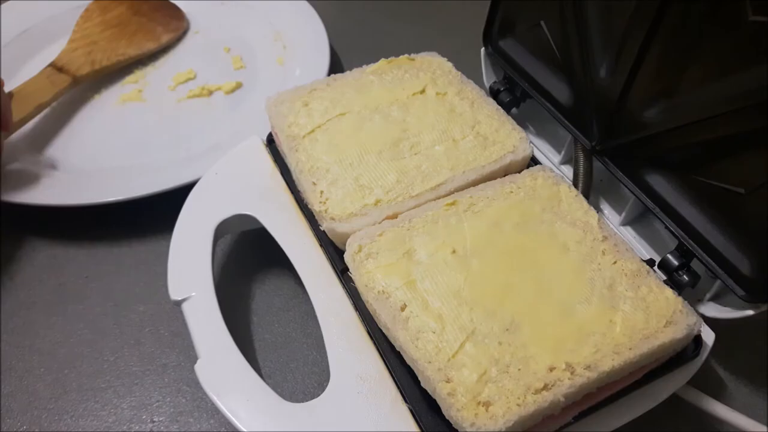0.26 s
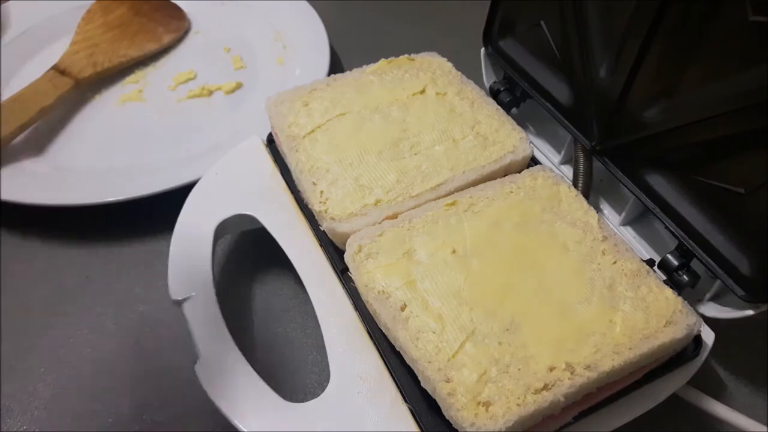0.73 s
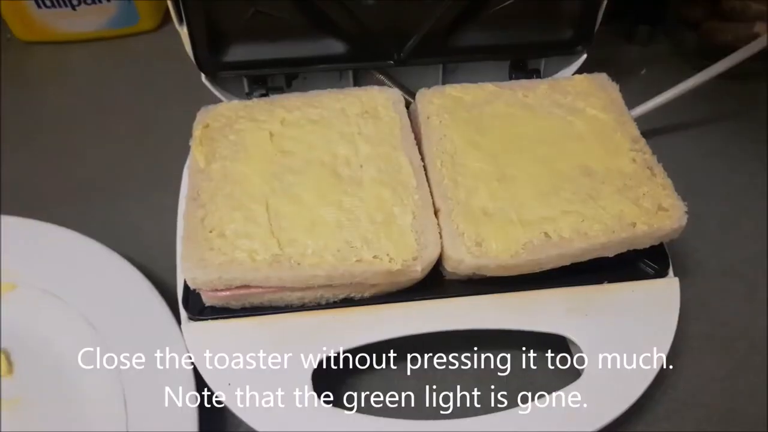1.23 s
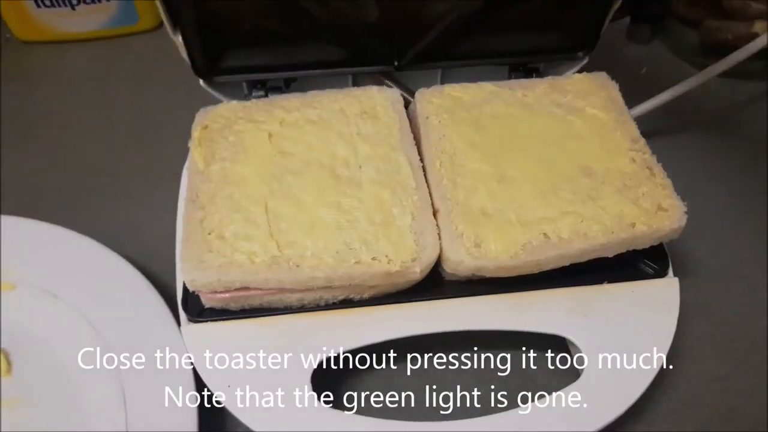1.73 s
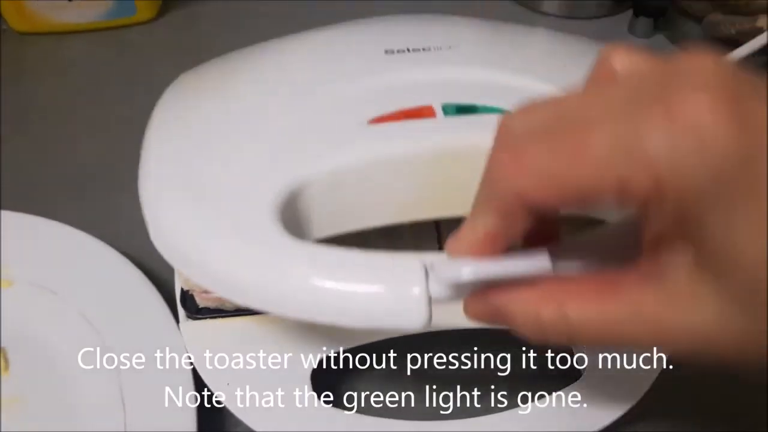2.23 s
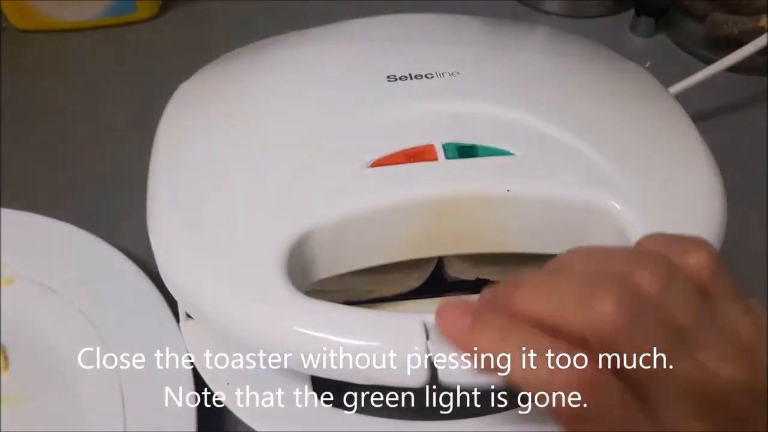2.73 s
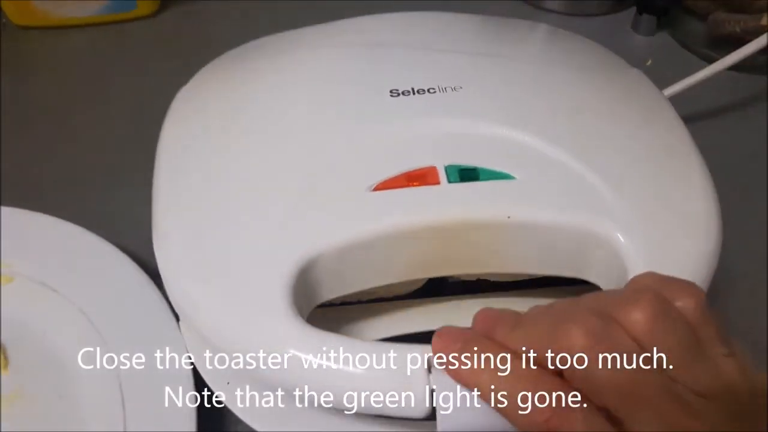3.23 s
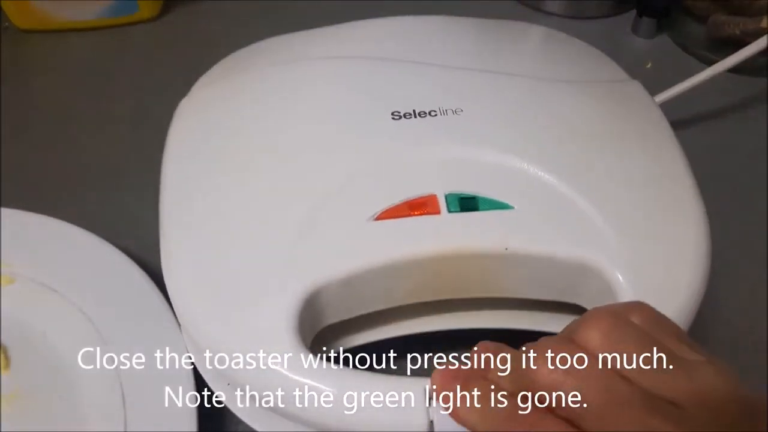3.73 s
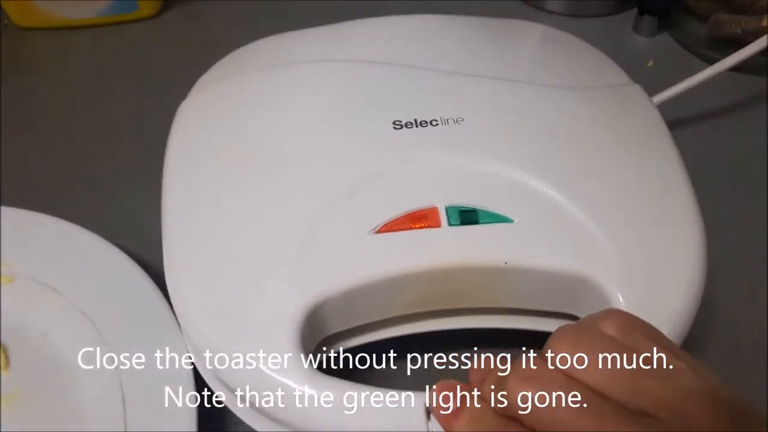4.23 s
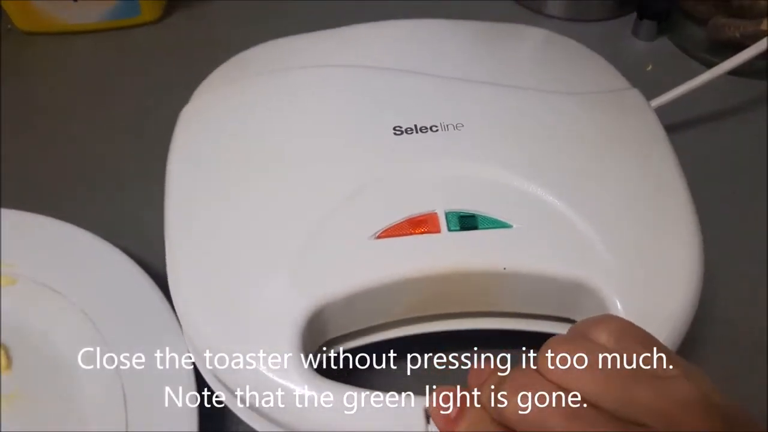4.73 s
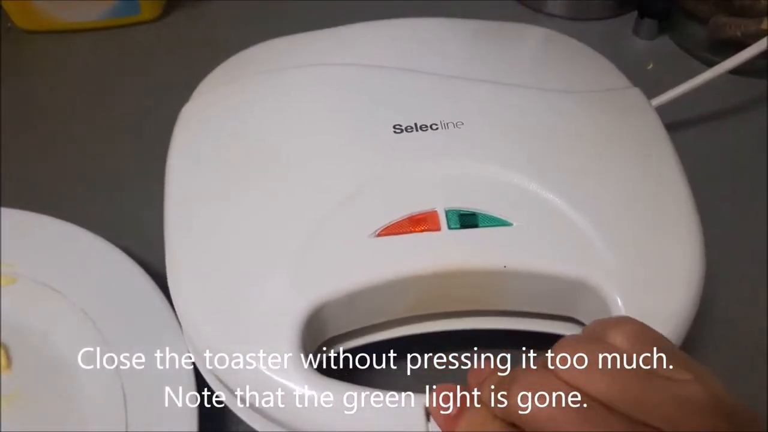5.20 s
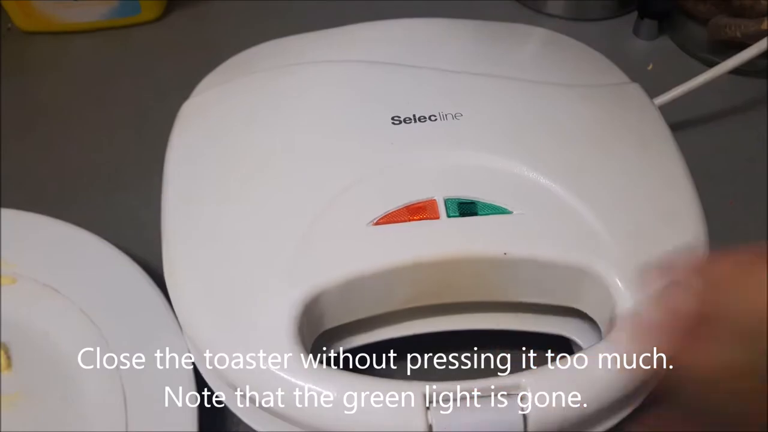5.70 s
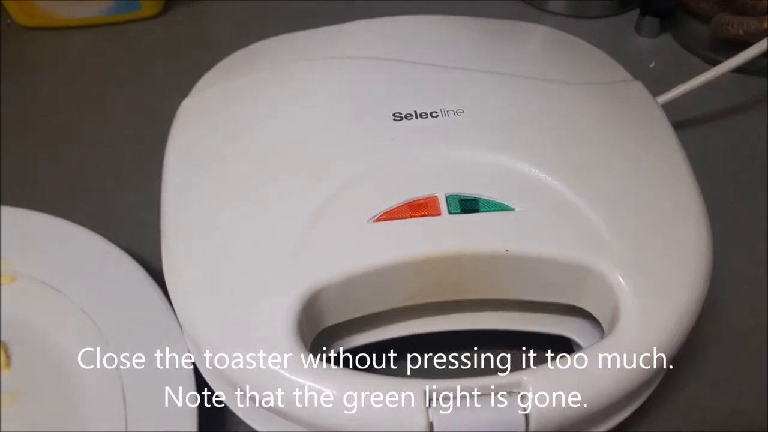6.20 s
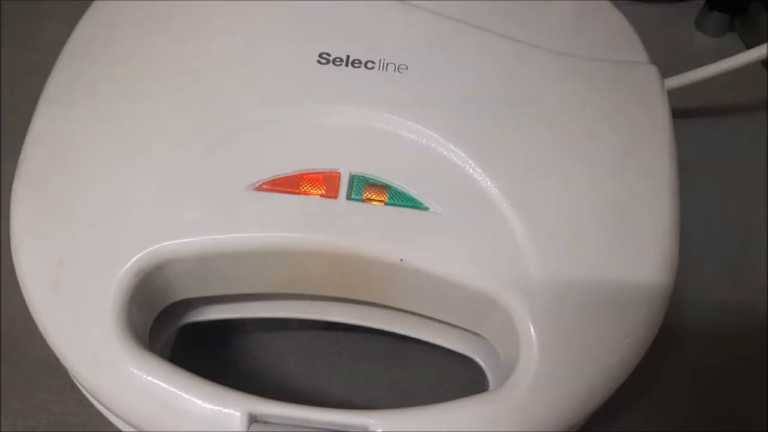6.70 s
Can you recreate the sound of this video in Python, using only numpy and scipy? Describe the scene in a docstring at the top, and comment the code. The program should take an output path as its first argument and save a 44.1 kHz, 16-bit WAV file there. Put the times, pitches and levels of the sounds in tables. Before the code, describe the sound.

A few ringing knocks of a utensil on a china plate open the scene, and the sound briefly cuts out. Close by, butter spits in a hot sandwich toaster while its plastic lid creaks over and drops with a sharp clack. Lighter knocks follow, and a high sizzle surges, then dulls to soft gurgling and crackling under the shut lid. A faint, low hum runs beneath it all in a small kitchen.

```python
"""A utensil knocks and clatters on a china plate, ringing its modes and thudding into a kitchen worktop.
After a short fade to silence, the plastic lid of a sandwich toaster close by is pulled over, clacks down
and is pressed onto buttered bread. Water bursting in the hot butter spits, flares into a sizzle and
sinks to a muffled bubbling as the lid seals. A low appliance hum lies underneath."""
import sys
import numpy as np
from scipy import signal
from scipy.fft import rfft, irfft, next_fast_len
from scipy.io import wavfile
from scipy.ndimage import uniform_filter1d

SR = 44100
rng = np.random.default_rng(int(sys.argv[2]) if len(sys.argv) > 2 else 0)


def wrap_up_sound(samples):
    """Save the sound to the file named by the first command line argument, as 16-bit audio."""
    columns = np.atleast_2d(samples).T
    # keep every value between -1 and 1, then stretch to whole-number steps
    tamed = np.clip(columns, -1, 1)
    steps = np.round(tamed * 32767).astype(np.int16)
    wavfile.write(sys.argv[1], SR, steps)


N = 306495
TIME = np.arange(N) / SR
RING_TIME = TIME[:SR // 2]


def amp(db):
    """Amplitude ratio of a level in decibels."""
    return 10 ** (np.asarray(db) / 20)


def unit(x):
    """Normalisation to rms 1."""
    return x / np.sqrt(np.mean(x ** 2) + 1e-20)


def read(points, hz):
    """Interpolation on a log-frequency axis."""
    point_hz, value = np.transpose(points)
    return np.interp(np.log(hz + 1), np.log(point_hz + 1), value)


def add(mix, start_s, sound):
    """Superposition of a sound onto the mix."""
    part = mix[max(round(start_s * SR), 0):][:len(sound)]
    part += sound[:len(part)]


def through(x, response):
    """Convolution, cut to the input's length."""
    return signal.oaconvolve(x, response)[:len(x)]


def pulse(spectrum, size=4096):
    """Minimum phase: the shortest causal pulse with a given spectrum, peak 1."""
    log_gain = np.log(amp(read(spectrum, abs(np.fft.fftfreq(size, 1 / SR)))))
    response = np.fft.ifft(np.exp(np.conj(signal.hilbert(log_gain)))).real[:size // 2]
    return response / abs(response).max()


def noise(gain_at, size=N):
    """Gaussian noise of rms 1, shaped by a function of frequency."""
    hz = np.fft.rfftfreq(next_fast_len(size, True), 1 / SR)
    real, imag = rng.standard_normal((2, len(hz)))
    return unit(irfft((real + 1j * imag) * gain_at(hz))[:size])


def dying(t60_s):
    """Exponential decay by 60 dB in t60_s."""
    return np.exp(-np.log(1000) * RING_TIME / t60_s)


def ramp(start_s, length_s):
    """Linear rise from 0 to 1."""
    return np.clip((TIME - start_s) / length_s, 0, 1)


def swell(peak_s, hold_s, rise_db_per_s, fade_db_per_s):
    """Exponential growth to 1, a hold, then exponential decay."""
    before_s, after_s = np.maximum(peak_s - TIME, 0), np.maximum(TIME - peak_s - hold_s, 0)
    return amp(-rise_db_per_s * before_s - fade_db_per_s * after_s)


def bell(hz, centre_hz, octaves):
    """Band-pass gain, symmetric in log frequency."""
    return 1 / (1 + (np.log2((hz + 1) / centre_hz) / octaves) ** 4)


def ring(modes):
    """Free vibration: a sum of damped sinusoids."""
    return sum(amp(db) * dying(t60_s) * np.sin(2 * np.pi * hz * RING_TIME) for hz, db, t60_s in modes)


def scatter(cloud_db, t60_s):
    """An impulse followed by a decaying cloud of smaller ones."""
    cloud = rng.standard_normal(len(RING_TIME)) * dying(t60_s) * (1 - dying(t60_s / 10))
    return signal.unit_impulse(len(cloud)) + amp(cloud_db) * cloud / np.linalg.norm(cloud)


def bursts(per_s, spread_db):
    """Shot noise of rms 1: random clicks, most small and a few large."""
    size = amp(spread_db * np.minimum(rng.exponential(1, N), 4)) * rng.choice([-1, 1], N)
    occurs = rng.random(N) < per_s / SR
    return unit(size * occurs / np.sqrt(per_s))


def kitchen(x, wet_db, bass_t60_s, treble_t60_s):
    """Reverberation: a diffuse tail with its own decay time at each frequency."""
    reflections = rng.standard_normal(len(RING_TIME)) * (1 - dying(0.025))
    hz, t, bands = signal.stft(reflections, SR, nperseg=256)
    t60_s = read([(200, bass_t60_s), (10000, treble_t60_s)], hz)[:, None]
    tail = signal.istft(bands * np.exp(-np.log(1000) * t / t60_s), SR, nperseg=256)[1]
    return x + amp(wet_db) * through(x, tail / np.linalg.norm(tail))


# partials of the appliance hum: pitch_hz, level_db, width_hz
HUM_PARTIALS = [(49.7, -68.5, 3), (101.8, -66, 8.5), (146.75, -57, 28), (291, -66.5, 11), (393, -76, 10),
                (596, -78.5, 4.1)]
# the kitchen's air noise: frequency_hz, level_db
AIR_SPECTRUM = [(15, 8), (40, 8.5), (70, -1), (140, 3), (220, -1), (330, -5.5), (550, -6), (1000, -11),
                (2000, -20.5), (4000, -24), (6500, -33.5), (16000, -32)]

def background():
    """Random amplitude and phase modulation makes a hum waver over steady air noise."""
    hum, frames = np.zeros(N), TIME[::100]
    for hz, db, width_hz in HUM_PARTIALS:
        pole = np.exp(-np.pi * width_hz * frames[1])
        waver = unit(signal.lfilter([1], [1, -pole], rng.standard_normal((2, len(frames)))))
        wobble, drift = (np.interp(TIME, frames, row) for row in waver)
        hum += amp(db + 2.4 * wobble) * np.sqrt(2) * np.sin(2 * np.pi * hz * TIME + 0.47 * drift)
    return hum + amp(-57) * noise(lambda f: amp(read(AIR_SPECTRUM, f)))


# strokes of hinge and bread as the lid moves: start_s, length_s, level_db, centre_hz
RUB_STROKES = [(1.675, 0.13, -54.5, 615), (1.788, 0.055, -52.5, 1840), (1.832, .06, -55.5, 600),
               (2.18, 0.093, -51.5, 920), (2.24, .12, -53, 630), (4.224, 0.098, -57, 2400)]

def rubbing():
    """Stick-slip friction: uneven slips, each a dull click, swell and fade through a stroke."""
    out, slips = np.zeros(N), bursts(per_s=490, spread_db=1)
    for start_s, length_s, db, centre_hz in RUB_STROKES:
        stroke = slips[round(start_s * SR):round((start_s + length_s) * SR)]
        band = bell(np.fft.rfftfreq(len(stroke), 1 / SR), centre_hz, octaves=0.6)
        rub = irfft(rfft(stroke) * band)
        add(out, start_s, amp(db) * unit(rub * signal.windows.tukey(len(rub))))
    return out


# blows on the plate: start_s, thud_db, ring_db, centre_hz, spread_octaves, splash_db, splash_t60_s
UTENSIL_BLOWS = [(0.0, -24, -33, 800, 1.37, -46, 0.15), (0.013, -44, -32.5, 2223, 0.02, -82, 0.14),
                 (0.031, -33.5, -27.5, 2400, 0.02, -77, .16), (0.338, -27.5, -28, 1555, 0.11, -32.5, 0.06),
                 (0.46, -35, -16.5, 7500, 0.9, -20.5, 0.21), (0.4615, -14.5, -17, 1900, 2.2, -19.5, 0.15),
                 (0.475, -22.5, -32, 2394, 0.49, -21.5, 0.13),
                 (0.497, -30.5, -29.5, 2603, 0.56, -34.5, .13)]
# china modes, in close pairs: pitch_hz, level_db
CHINA_MODES = [(686, -15), (729, -14), (801, -13), (1379, -14), (1444, -9), (1517, -15), (1692, -17),
               (1725, -16), (2174, -13), (2208, -11), (2243, 0), (2480, -17), (2719, -15), (2777, -6),
               (2838, -13), (3032, -10), (3080, -15), (3166, -18), (3951, -19), (4002, -18), (4182, -16),
               (4230, -20), (4381, -21), (4489, -21), (4996, -23), (5238, -24), (7309, -23), (8609, -22),
               (9910, -23), (10028, -21), (12840, -33), (14750, -33)]
# their damping: pitch_hz, t60_s
CHINA_DECAY = [(700, .2), (2240, .195), (2800, .18), (10000, .16)]
# modes of the worktop and what stands on it: pitch_hz, level_db, t60_s
WORKTOP_MODES = [(102, -24.5, 0.15), (148, -14, 0.68), (183.8, -10.5, 0.74), (237.2, -17, 0.3),
                 (283, -13.5, 0.15), (380.4, -4, 0.18), (425, 6.5, 0.017), (466, -12, 0.18),
                 (538.7, -9.5, 0.27)]
# a blow's thud and its splash of fine modes: frequency_hz, level_db
THUD_SPECTRUM = [(60, -33.5), (200, -4), (400, 3.5), (800, -3), (1100, -11), (2800, -15), (3600, -41),
                 (8000, -46), (16000, -64.5)]
SPLASH_SPECTRUM = [(300, -23.5), (1100, -17), (1500, -1.5), (2000, -5), (2900, -0.5), (3600, -19),
                   (4300, -11), (6000, -23), (7200, -19), (10000, -16), (12000, -23.5), (16000, -43)]

def plate():
    """Modal excitation: a blow rings the china modes its contact favours, finer ones and the worktop."""
    out, thud_pulse, splash_pulse = np.zeros(N), pulse(THUD_SPECTRUM), pulse(SPLASH_SPECTRUM)
    china = np.array([ring([(hz, db, read(CHINA_DECAY, hz))]) for hz, db in CHINA_MODES])
    china *= rng.choice([-1, 1], (len(china), 1))  # each mode starts upward or downward
    boom = amp(-5) * ring(WORKTOP_MODES) * (1 - dying(0.013))
    for start_s, thud_db, ring_db, centre_hz, octaves, splash_db, t60_s in UTENSIL_BLOWS:
        clink = bell(np.array(CHINA_MODES)[:, 0], centre_hz, octaves) @ china
        splash = through(scatter(cloud_db=11, t60_s=t60_s), splash_pulse)
        cutoff_hz = min(2.2 * centre_hz, SR / 2.5)  # a soft contact gives little treble
        splash = signal.lfilter(*signal.butter(2, cutoff_hz, fs=SR), splash)
        thud = through(scatter(cloud_db=6, t60_s=0.58 * t60_s), thud_pulse) + boom
        add(out, start_s, amp(ring_db) * clink + amp(splash_db) * splash + amp(thud_db) * thud)
    return out


# low bumps through the worktop and the toaster's feet: start_s, level_db
BUMPS = [(0.559, -41), (0.70, -41.5), (1.676, -38.5), (1.865, -43), (2.022, -30)]
# modes of the feet: pitch_hz, level_db, t60_s
FEET_MODES = [(99.5, 3, 0.28), (122, -23, 0.16)]

def rocking():
    """Mass on a spring: each bump sets the toaster vibrating on its feet."""
    out, bump = np.zeros(N), ring(FEET_MODES) * (1 - dying(0.038))
    for start_s, db in BUMPS:
        add(out, start_s, amp(db) * bump)
    return out


# the lid falls onto its hinge stop and rattles: start_s, level_db
LID_CLACKS = [(2.0165, -6), (2.0197, -45), (2.028, -21), (2.0442, -24)]
# one clack: frequency_hz, level_db
CLACK_SPECTRUM = [(50, -28.5), (200, -10.5), (255, -12), (340, 4), (600, -5), (1050, -12), (1500, -12),
                  (1900, -19), (3000, -31.5), (5500, -33), (11000, -35), (12500, -46.5), (16000, -52.5)]
# modes of the toaster's casing: pitch_hz, level_db, t60_s
CASING_MODES = [(191, 1, 0.19), (346, 6, 0.058), (384, 4, .12), (430, 11.5, 0.063), (521, -2.5, 0.13),
                (610, -23, .2), (713, -1.5, 0.19), (835, 2, .13), (938, -2.5, 0.16), (1270, -12.5, 0.14),
                (1540, -9.5, .1)]
# knocks of lid, hinge and handle: start_s, level_db, pitch_hz, relative_thump_db
LID_KNOCKS = [(1.544, -37, 2900, -9), (1.590, -36, 545, -7), (1.657, -36, 2880, -12),
              (1.668, -24.5, 703, -6), (1.728, -36.5, 600, 5), (1.826, -30.5, 1960, -1.5),
              (1.9471, -36.5, 2900, 0), (2.0033, -22, 1450, -7), (2.201, -33.5, 705, 1),
              (2.223, -30, 568, -1), (2.2398, -21.5, 808, 1.5), (2.3065, -40, 570, 2),
              (2.4287, -40.5, 506, 1), (2.5254, -33, 568, -2), (2.5461, -23, 440, -7.5),
              (2.860, -33, 4290, -11), (2.8614, -31.5, 1800, -3), (3.146, -41.5, 1000, 6),
              (4.2144, -45.5, 2000, 1), (4.255, -42.5, 880, 7), (4.6448, -40.5, 1810, -14),
              (5.594, -46, 1090, 6), (5.6916, -37, 1820, -1), (5.695, -37.5, 530, -18),
              (5.955, -48, 990, 0), (6.4785, -45.5, 1250, 4.5), (6.5366, -49.5, 1070, 7),
              (6.6867, -45.5, 1500, 11)]

def lid():
    """Impact excitation: the clack rings the casing; lighter knocks ring one spot of the plastic."""
    out, clack, casing = np.zeros(N), pulse(CLACK_SPECTRUM), ring(CASING_MODES)
    for start_s, db in LID_CLACKS:
        blow = through(scatter(cloud_db=-1, t60_s=0.042), clack)
        add(out, start_s, amp(db) * (blow + amp(-26.5) * casing))
    for start_s, db, hz, thump_db in LID_KNOCKS:
        t60_s = 0.03 * (1000 / hz) ** 0.65  # higher pitches die sooner
        rattle_db = -8 + 4 * np.log2(hz / 1000)  # and rattle more
        rattle = noise(lambda f: bell(f, hz, octaves=0.75), size=len(RING_TIME)) * dying(t60_s)
        knock = ring([(hz, -1, t60_s)]) + amp(rattle_db) * rattle
        add(out, start_s, amp(db) * knock * (1 - dying(0.0029)))
        add(out, start_s, amp(db + thump_db) * clack)
    return out


# butter flares up where the bread meets the hot plate:
# peak_s, hold_s, rise_db_per_s, fade_db_per_s, fizz_db, crackle_db
BUTTER_FLARES = [(0, 0.81, 20, 30, -62.5, -69), (1.68, 0.3, 21.5, 6, -55, -60.5),
                 (2.228, 0.024, 125, 150, -45.5, -50.5), (2.775, 0.088, 75, 60, -48.5, -63),
                 (2.966, .22, 240, 51, -40, -63), (3.269, 0.12, 126, 79, -36.5, -57.5),
                 (3.6, 0.25, 30.5, 12, -51, -72)]

def frying():
    """Incoherent sources add in power: the summed flares give the gains of fizz and crackle."""
    fizz_power, crackle_power = amp(-84) ** 2, 0  # a faint fizz remains under the shut lid
    for *shape, fizz_db, crackle_db in BUTTER_FLARES:
        flare = swell(*shape)
        fizz_power += (amp(fizz_db) * flare) ** 2
        crackle_power += (amp(crackle_db) * flare) ** 2
    return np.sqrt(fizz_power), np.sqrt(crackle_power)


# the loudest spits of butter: start_s, level_db, pitch_hz
LOUD_SPITS = [(.0817, -41, 13000), (.7484, -37.5, 9500), (1.3214, -39, 2720), (1.4255, -35.5, 9800),
              (1.5462, -37, 11000), (1.5886, -32.5, 3003), (1.7345, -38, 10000), (1.763, -37, 11000),
              (1.8865, -42, 10000), (2.1685, -31, 12500), (2.201, -29.5, 10000), (2.374, -37, 10500),
              (2.9052, -25, 13500), (2.943, -26.5, 13000), (3.3372, -22, 9000), (5.4568, -43.5, 8500)]
# the snap of one spit: frequency_hz, level_db
SNAP_SPECTRUM = [(500, -29.5), (1500, -23.5), (2600, 0.5), (3300, -30), (4100, -5.5), (6200, -6), (8000, 2),
                 (10000, 10), (12500, -1.5), (16000, -11)]

def spits():
    """Flash boiling: water drops burst in hot butter, a few loudly, the rest as a random spatter."""
    snap = pulse(SNAP_SPECTRUM)
    fizz_gain, _ = frying()
    spits_per_s, over_fizz_db = 14, rng.uniform(9, 19, N)
    spatter = fizz_gain * amp(over_fizz_db) * (rng.random(N) < spits_per_s / SR)
    out = through(spatter, through(scatter(cloud_db=3, t60_s=0.011), snap))
    for start_s, db, hz in LOUD_SPITS:
        bubble_ring = noise(lambda f: bell(f, hz, octaves=0.3), size=len(RING_TIME)) * dying(0.012)
        burst = through(scatter(cloud_db=3, t60_s=0.012), snap)
        add(out, start_s, amp(db) * (burst + amp(-7) * bubble_ring))
    return out


def boiling(course):
    """Power sum of a swelling boil and its resting level, as a gain."""
    *shape, top_db, rest_db = course
    return np.hypot(amp(top_db) * swell(*shape), amp(rest_db))


# water boils inside the bread: peak_s, hold_s, rise_db_per_s, fade_db_per_s, top_db, rest_db
GURGLE_COURSE = (1.62, 3, 35.5, 8, -54.5, -66)
CRACKLE_COURSE = (3.5, 0.81, 11.5, 13, -56.5, -80.5)
STEAM_COURSE = (4.5, 0.53, 25, 30, -69, -94.5)
# bubbles at the open edge (fizz) and under the lid (gurgle, crackle): frequency_hz, level_db
FIZZ_SPECTRUM = [(1500, -45), (4500, -28), (6000, -18.5), (7000, -13), (8100, -8), (9700, 0.5), (11000, -2),
                 (12500, -11), (14500, -8.5), (16000, -12)]
GURGLE_SPECTRUM = [(60, -40), (120, -16), (220, -9), (330, 2.5), (520, 0), (760, -3), (1050, -4.5),
                   (1500, -14), (2500, -19.5), (6000, -36.5), (16000, -55.5)]
CRACKLE_SPECTRUM = [(500, -20), (1400, -8), (2000, -2), (2450, -1), (3300, -9), (4200, -4.5), (6000, -17),
                    (9000, -16.5), (16000, -44.5)]

def sizzle():
    """Shot noise of bursting bubbles: bright clumps at the open edge, duller ones under the lid."""
    fizz_gain, flare_crackle_gain = frying()
    clumps = amp(2.5 * noise(lambda f: 1 / (1 + (f / 250) ** 2)))
    bursts_per_s = 1350 + 4150 * ramp(start_s=2, length_s=0.8)  # the lid squeezes the bread
    bright = unit(through(bursts(bursts_per_s, spread_db=3) * clumps, pulse(FIZZ_SPECTRUM)))
    dull = amp(-5.5) * unit(uniform_filter1d(bright, size=3))
    dull_share = 0.15 + 0.68 * ramp(start_s=4.03, length_s=1)  # the lid seals in the treble
    fizz = ((1 - dull_share) * bright + dull_share * dull) * fizz_gain
    surges = amp(1.3 * noise(lambda f: 1 / (1 + (f / 30) ** 2)))  # steam escapes in fits
    gurgle = unit(through(bursts(per_s=1500, spread_db=3), pulse(GURGLE_SPECTRUM)))
    gurgle *= boiling(GURGLE_COURSE)
    crackle = unit(through(bursts(per_s=2500, spread_db=3), pulse(CRACKLE_SPECTRUM)))
    crackle *= np.hypot(flare_crackle_gain, boiling(CRACKLE_COURSE))
    steam = noise(lambda f: bell(f, centre_hz=9600, octaves=0.09))  # hiss through the shut lid's gap
    steam *= boiling(STEAM_COURSE)
    return surges * (fizz + gurgle + crackle + steam)


# a faint hiss in the side: frequency_hz, level_db
HISS_SPECTRUM = [(60, -14), (200, 3.5), (600, 6), (2400, 2.5), (4500, -12.5), (16000, -21)]

def scene():
    """Mid-side stereo: all sources share the middle; the side holds only a faint difference of reflections and
    a quiet hiss."""
    crockery = kitchen(plate(), wet_db=-9, bass_t60_s=0.33, treble_t60_s=0.21)
    toaster = lid() + rocking() + rubbing() + spits() + sizzle()
    toaster = kitchen(toaster, wet_db=-9.5, bass_t60_s=0.23, treble_t60_s=0.18)
    mid = crockery + toaster + background()
    side = kitchen(mid, wet_db=-66.5, bass_t60_s=0.1, treble_t60_s=0.1) - mid
    side += amp(-82) * noise(lambda f: amp(read(HISS_SPECTRUM, f)))
    return np.array([mid + side, mid - side])


def record(dry):
    """Band limiting trims deep bass and top treble; fades bring silence in the pause and at the end."""
    low_cut_hz, high_cut_hz, master_db = 70, 15950, -1.38
    pause_s, resume_s, end_s, fade_out_s, fade_in_s = 0.881, 1.207, 6.755, 0.019, 0.3
    fader = 1 - ramp(pause_s, fade_out_s) + ramp(resume_s, fade_in_s) - ramp(end_s, fade_out_s)
    highpass = signal.butter(2, low_cut_hz, "highpass", fs=SR, output="sos")
    lowpass = signal.firwin(511, high_cut_hz, window=("kaiser", 9), fs=SR)
    faded = signal.sosfilt(highpass, dry) * amp(master_db) * fader
    return signal.oaconvolve(faded, lowpass[None], "same")


dry = scene()
out = record(dry)
wrap_up_sound(out)
```